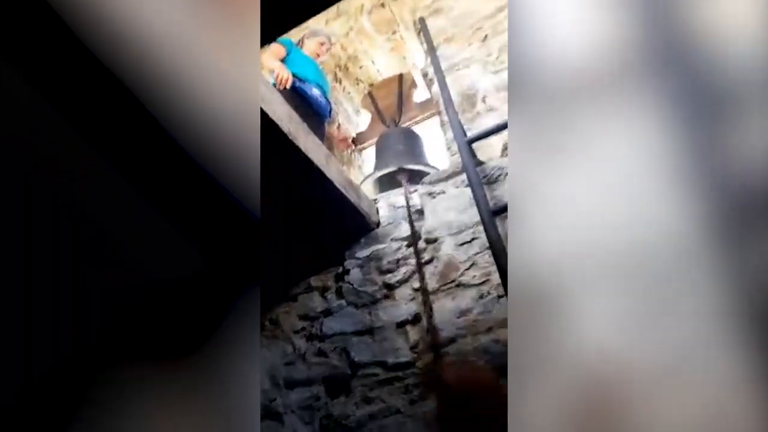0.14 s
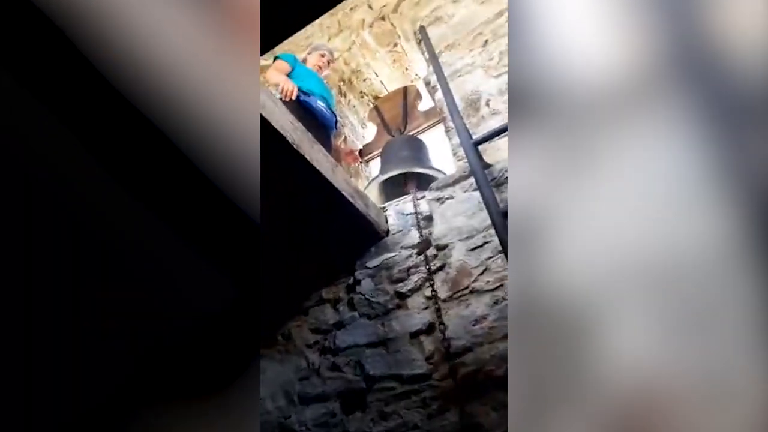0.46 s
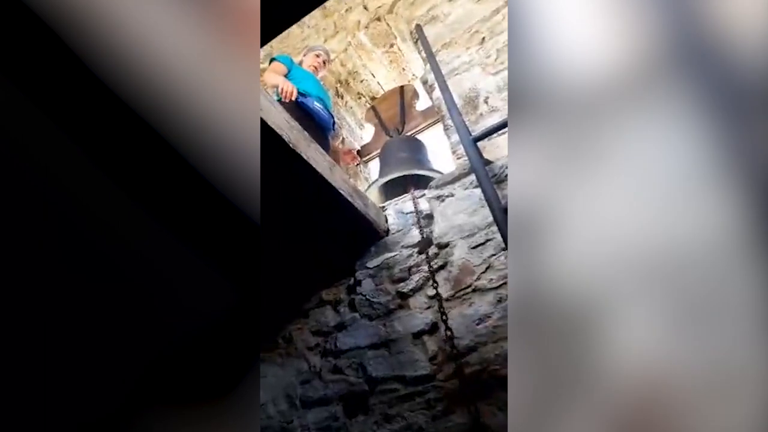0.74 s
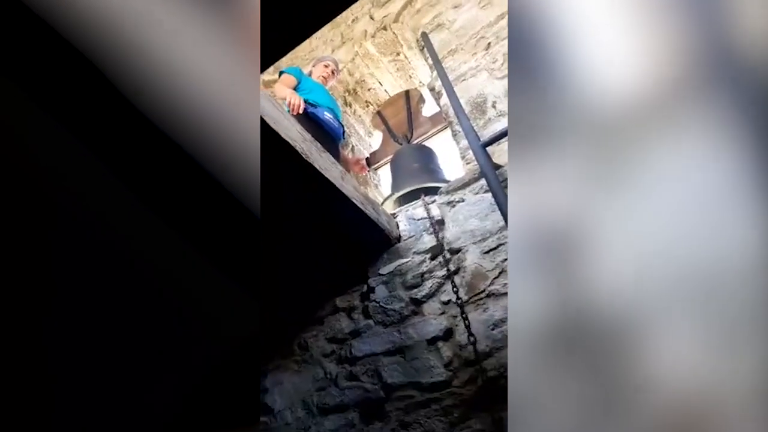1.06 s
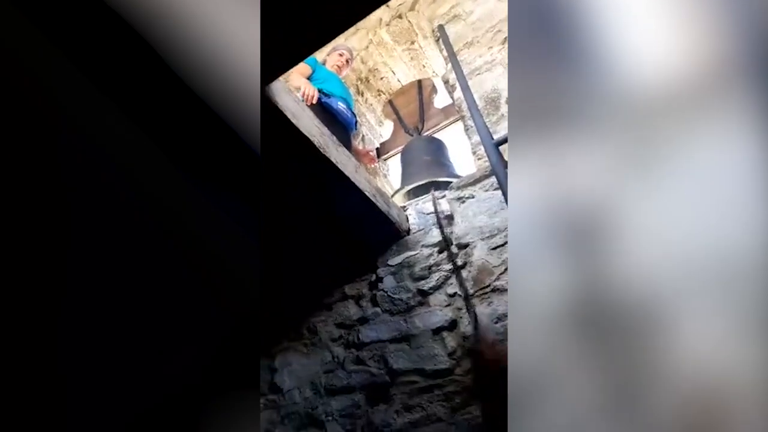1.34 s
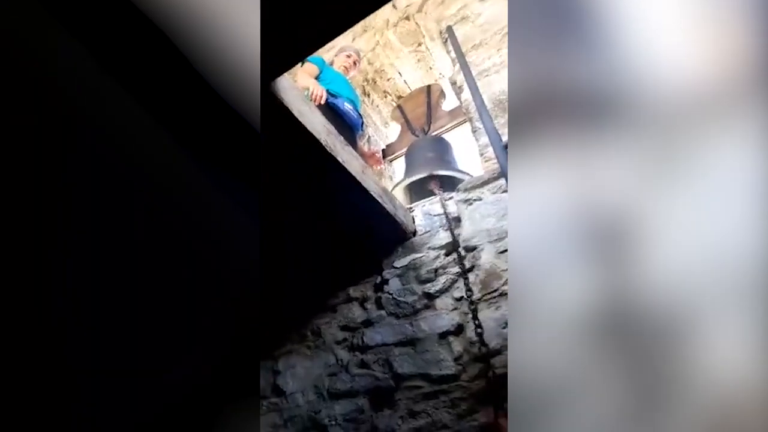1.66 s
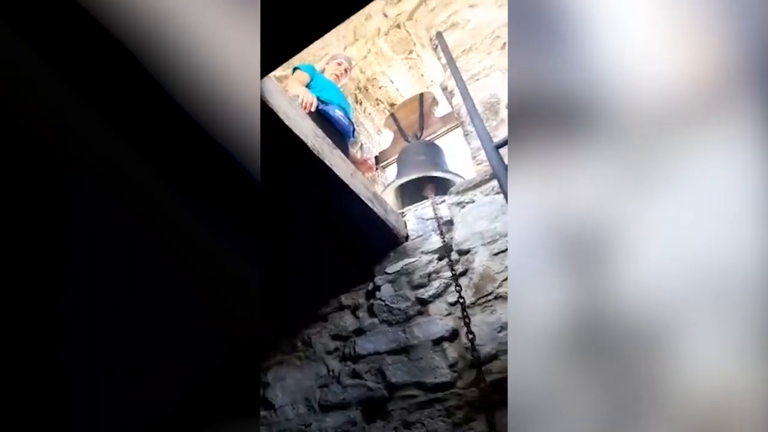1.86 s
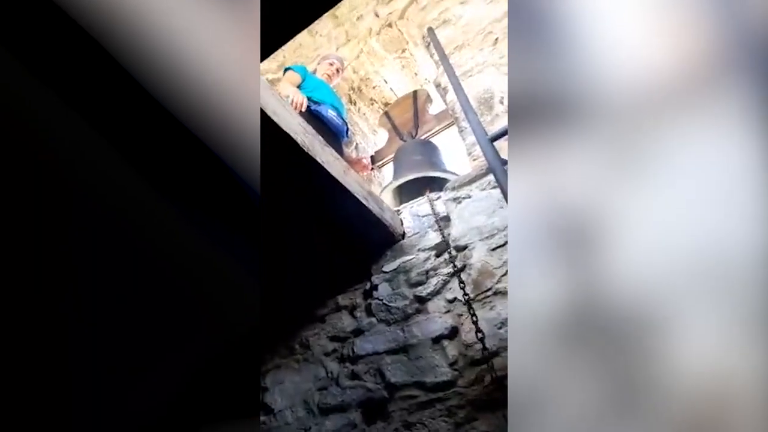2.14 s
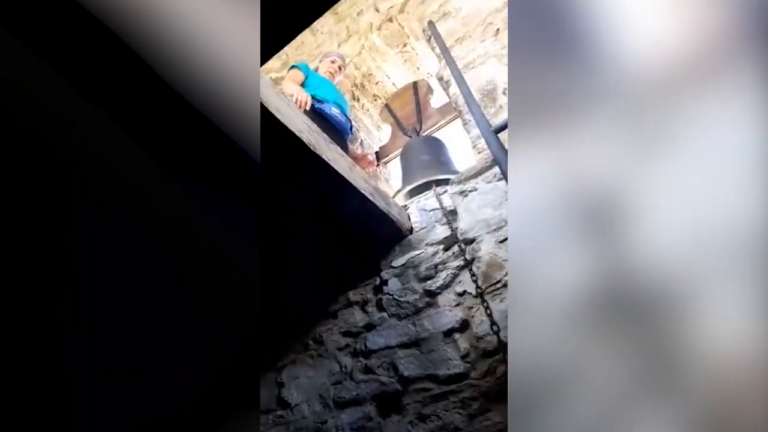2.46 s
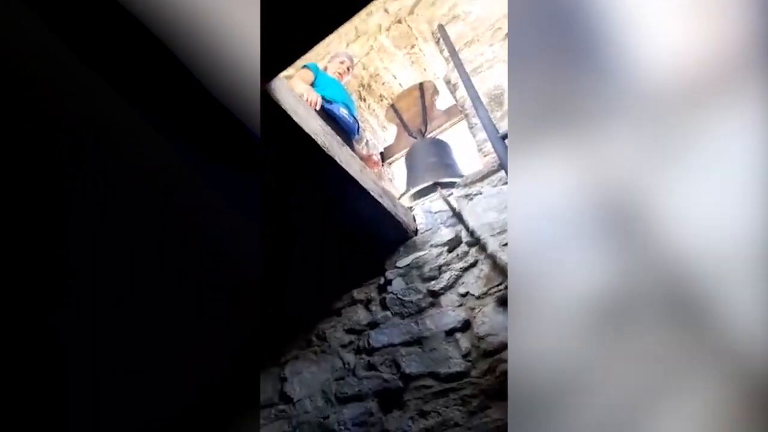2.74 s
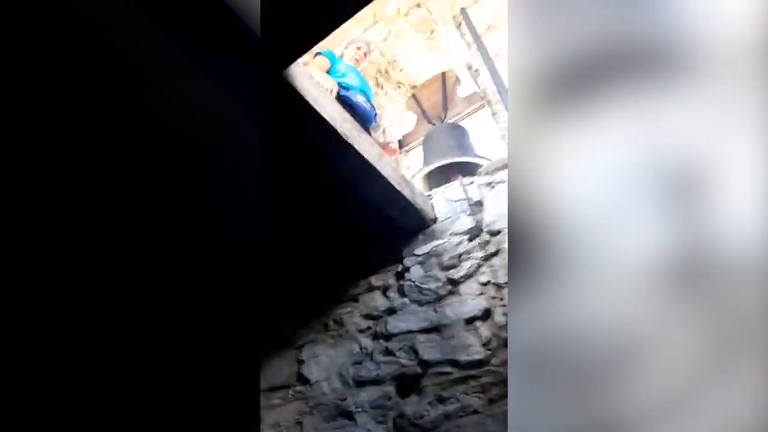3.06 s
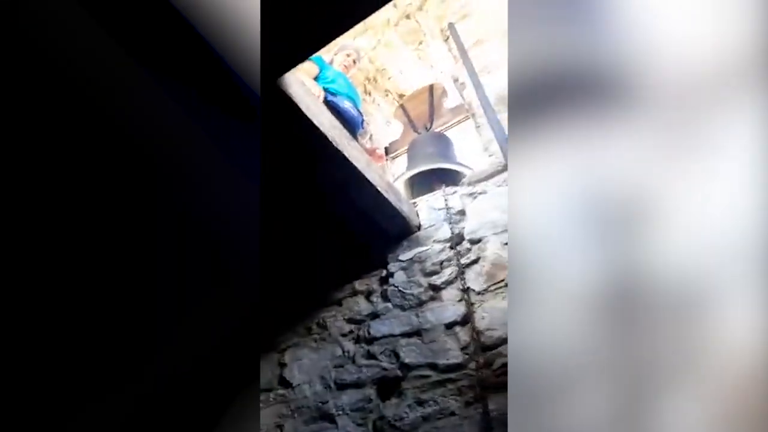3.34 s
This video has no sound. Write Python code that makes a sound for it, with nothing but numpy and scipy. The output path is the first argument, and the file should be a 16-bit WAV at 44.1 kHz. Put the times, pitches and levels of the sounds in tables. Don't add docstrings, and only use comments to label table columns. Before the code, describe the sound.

A large church bell, already humming faintly, is struck by its clapper at about 0.1, 1.5 and 2.7 seconds. Each blow clangs sharply off the stone walls, then rings on with wavering, beating tones and a thin high shimmer, the phone's level creeping up between strokes. Faint rope rustles come between, denser after 3.0, with dry ticks around 3.4 to 3.5. Quiet low tower air lies beneath, in mono.

```python
import sys
import numpy as np
from scipy import signal
from scipy.fft import irfft
from scipy.io import wavfile
from scipy.ndimage import uniform_filter1d, map_coordinates

SR = 44100
rng = np.random.default_rng(int(sys.argv[2]) if len(sys.argv) > 2 else 0)


def amplitude_ratio(level_db):
    exponent = np.asarray(level_db, float) / 20
    return 10 ** exponent


def int16_out(signal):
    q = np.round(np.clip(np.atleast_2d(signal).T, -1, 1) * 32767)
    wavfile.write(sys.argv[1], SR, q.astype(np.int16))


N = 154350
STEP = 32


def along(points, hz):
    f, value = np.transpose(points)
    return np.interp(np.log(hz + 1), np.log(f + 1), value)


def noise(spectrum, decay=None, size=None):
    size = size or N
    hz, t, z = signal.stft(rng.standard_normal(size), SR, nperseg=512)
    gain = amplitude_ratio(along(spectrum, hz))[:, None]
    gain = gain / np.sqrt(np.mean(gain ** 2))
    if decay:
        gain = gain * amplitude_ratio(-60 * t / along(decay, hz)[:, None])
    return signal.istft(z * gain, SR, nperseg=512)[1][:size]


def wander(points, position):
    return map_coordinates(rng.standard_normal(points), [position])


def flutter(size, db):
    z = rng.standard_normal((2, size))
    z = uniform_filter1d(z, size=14, axis=1)
    z = uniform_filter1d(z, size=9, axis=1) * 3
    return 1 + amplitude_ratio(db) * (z[0] + 1j * z[1])


def tone(swing, hz, size):
    i, k = np.arange(size), np.arange(len(swing)) * STEP
    phase = 2 * np.pi * (hz * i / SR + rng.random())
    return np.interp(i, k, swing.real) * np.sin(phase) + np.interp(i, k, swing.imag) * np.cos(phase)


# (f/Hz, level/dB)
AIR = [(25, -28), (80, -11), (200, -12), (450, -31.5), (1000, -35), (4000, -27.5), (14000, -60)]


def tower_air():
    gusts = amplitude_ratio(3.6 * wander(40, np.arange(N) / SR * 10))
    return amplitude_ratio(-70) * gusts * noise(AIR)


STROKES = [
    .131,
    1.457,
    2.733,
]
# (f/Hz, t60/s, twin's offset f/Hz, twin's t60/s)
PARTIALS = [(270.6, 11.8, 1.27, 33.09), (568.8, 13.11, -2.39, 13.88), (688.2, 7.36, 0.79, 5.9),
            (744.1, 4.88, 1.13, 54.6), (1153.6, 3.14, 1.73, 1.08), (1251.6, 2.77, 0.66, 1.78),
            (1301.5, 2.66, 1.31, 1.11), (1414.4, 2.52, -4.45, 2.12), (1625.1, 3.23, 1.74, 1.35),
            (1748.7, 2.64, 1.46, 2.44), (2416.6, 2.7, 4.8, 2.2), (2495.7, 0.66, 2.19, 2.16),
            (3145.4, 2.23, 4.22, 1.95), (3935.4, 1.33, 1.83, 2.07), (1825.9, 1.27, 3.55, 0.79),
            (2102.5, 3.0, 1.11, 1.63), (2253.7, 1.67, 2.09, 1.24), (2318.4, 2.06, 4.08, 0.71),
            (2715.4, 2.66, 1.16, 3.9), (2910.1, 1.75, 8.35, 1.39), (3239.4, 2.66, 5.08, 0.89),
            (3661.8, 2.56, 1.81, 2.18), (4053.3, 3.0, 2.88, 1.21), (4407.6, 1.43, 1.32, 1.95),
            (4773.4, 0.79, 3.33, 1.77), (4914.6, 0.54, 2.51, 1.42), (5649.1, 1.37, 3.3, 0.63),
            (6548.6, 1.77, 3.22, 1.08)]
# (build-up t/s, level left from the earlier stroke/dB, level after each of three strokes/dB)
PARTIAL_DB = [(0.012, -31.5, -40, -45, -34), (0.049, -30, -34, -32, -25.0), (0.004, -38.2, -21, -37, -24),
              (0.013, -40, -31.5, -37.5, -25.5), (0.12, -43.5, -19.5, -15.5, -14.5),
              (0.069, -52, -19.5, -21.5, -27), (0.21, -58.5, -26.5, -27.5, -33.5),
              (0.033, -61.1, -26.5, -36, -28.5), (0.006, -71, -39, -38, -46),
              (0.091, -37.5, -12.5, -25, -19.5), (0.007, -51, -27.5, -40.5, -29),
              (0.135, -76.7, -16.5, -13, -33.5), (0.0013, -52.5, -22, -35.5, -42),
              (0.026, -57, -23.5, -20, -23), (0.135, -73, -33.5, -32, -24), (0.11, -78, -48.5, -56, -40),
              (0.135, -79.4, -30.5, -26.5, -35), (0.18, -74, -31.5, -34.5, -44.0),
              (0.17, -59, -30, -30.5, -29), (0.014, -85, -35.5, -34, -41), (0.22, -64.5, -32.5, -36, -27),
              (0.15, -71, -57.0, -45.3, -44.5), (0.15, -94, -44.5, -52.5, -37.4),
              (0.135, -82.5, -37.5, -40.6, -46), (0.073, -85.5, -20.5, -31.5, -30),
              (0.114, -78.5, -27.5, -22, -28), (0.06, -84, -33, -33.5, -34.5),
              (0.096, -88, -45, -42.6, -40)]
# (level/dB, level/dB, level/dB)
TWIN_DB = [(-22.7, -21.0, -26.5), (-31.5, -31, -34.5), (-30, -34.5, -37.5), (-44.5, -49.2, -42),
           (-13.5, -9, -17.5), (-22.5, -19, -14.4), (-31.1, -29, -31), (-30, -29, -32.3), (-23.1, -26, -24),
           (-26, -14.6, -11), (-28, -21.5, -24.0), (-50.5, -41.5, -36), (-22.5, -19.5, -18.5),
           (-33.5, -39.5, -20.5), (-20, -20.5, -21), (-36, -47, -45), (-36, -33.5, -22), (-30, -30.5, -31),
           (-44, -44.5, -36), (-26.5, -26.5, -30.5), (-20.5, -24.5, -26.5), (-47, -54, -55.5),
           (-29.5, -26.1, -22), (-43.5, -42.5, -36), (-46, -38, -34.5), (-27.5, -31.5, -33.8),
           (-28.5, -47, -34), (-37, -48.5, -46.5)]
# (t/s, t/s, t/s)
DIPS = [(0.022, 0.509, 0.02), (0.334, 0.307, 0.335), (0.022, 1.181, 1.192), (0.661, 0.706, 0.835),
        (0.412, 0.463, 0.367), (1.012, 1.117, 0.041), (0.146, 0.146, 0.023), (0.173, 0.165, 0.157),
        (0.53, 0.54, 0.487), (0.21, 0.293, 0.344), (0.19, 0.175, 0.175), (0.229, 0.394, 0.217),
        (0.024, 0.042, 0.036), (0.101, 0.072, 0.501), (0.224, 0.256, 0.056), (0.123, 0.16, 0.542),
        (0.089, 0.095, 0.054), (0.075, 0.015, 0.05), (0.223, 0.279, 0.418), (0.09, 0.089, 0.089),
        (0.166, 0.031, 0.087), (0.463, 0.032, 0.196), (0.024, 0.246, 0.275), (0.112, 0.082, 0.584),
        (0.109, 0.128, 0.244), (0.072, 0.033, 0.193), (0.065, 0.291, 0.021), (0.078, 0.039, 0.042)]


def beating_partials():
    direct = 0.21
    t, out = np.arange(N // STEP + 1) * STEP / SR, np.zeros(N)
    for partial, levels, twin_dbs, dips in zip(PARTIALS, PARTIAL_DB, TWIN_DB, DIPS):
        hz, t60, split, twin_t60 = partial
        rise, left_db, *dbs = levels
        swing = np.full(len(t), amplitude_ratio(left_db), complex)
        for s, db, twin_db, dip in zip(STROKES, dbs, twin_dbs, dips):
            u = np.clip(t - s, 0, None)
            twin = amplitude_ratio(twin_db - 60 * u / twin_t60) * np.exp(2j * np.pi * split * (u - dip))
            new = amplitude_ratio(db - 60 * u / t60) - twin
            new = new * np.exp(1j * np.angle(swing[round(s * SR) // STEP] / new[0]))
            old_share = direct * np.exp(-u / 0.0033) + (1 - direct) * np.exp(-u / max(rise, .002))
            swing = swing * old_share + new * (1 - old_share)
        out += tone(swing * flutter(len(t), -26.5), hz, N)
    return out


# (start t/s, length t/s, level/dB)
RUSTLES = [(.07, .05, -75), (0.492, 0.052, -66.5), (0.901, 0.11, -55), (1.41, .045, -68.5),
           (1.876, 0.11, -59), (2.094, 0.13, -69.5), (2.263, 0.13, -58.5), (2.699, .035, -72),
           (3.05, .1, -58.5), (3.221, 0.12, -56.5), (3.369, .2, -59)]
# (f/Hz, level/dB)
RUSTLE = [(1500, -34), (3500, -2.5), (6500, 1), (9000, -10), (12000, -4.5), (14500, -18)]
# (t/s, peak level/dB)
TICKS = [(3.377, -46), (3.3803, -37), (3.3857, -45.5), (3.4283, -43.5), (3.4303, -47), (3.463, -39),
         (3.4812, -37.5), (3.484, -39.5), (3.484, -36), (3.489, -41), (3.4908, -43), (3.4939, -36.5),
         (3.4976, -47)]


def rope():
    t, clicks, shape = np.arange(N) / SR, np.zeros(N), np.zeros(N)
    for s, length, db in RUSTLES:
        rise_db = 550 * (s + .01 - t)
        fall_db = 286 * (t - s - length) + 4.18
        shape += amplitude_ratio(db - np.clip(np.maximum(rise_db, fall_db), 0, None))
    shape *= amplitude_ratio(1.75 * wander(N // 150 + 4, np.arange(N) / 150))
    for s, db in TICKS:
        u = np.clip(t - s, 0, None)
        shape += (t >= s) * amplitude_ratio(db - 21) * (2 * amplitude_ratio(-60 * u / 0.007) + amplitude_ratio(-60 * u / .07))
        clicks[round(s * SR)] = amplitude_ratio(db + 10)
    tick = irfft(amplitude_ratio(along(RUSTLE, np.fft.rfftfreq(64, 1 / SR))))
    tick = np.roll(tick, 32) * np.hanning(64)
    return shape * noise(RUSTLE) + np.convolve(clicks, tick / tick.max(), "same")


# (f/Hz, t60/s)
CLANG = [(40, -39.5), (245, -14), (900, -12.5), (1300, -3.5), (4000, -9.5), (8000, -44.5), (14000, -62.5)]
CLANG_T60 = [(60, 0.6), (300, 0.5), (2000, 0.34), (12000, 0.55)]
# (f/Hz, t60/s)
SHIMMER = [(2000, -38), (3500, -8), (6000, -5.5), (7500, -30), (14500, -41.5)]
SHIMMER_T60 = [(3000, 2), (12000, 1.6)]


def clang():
    size = 2 * SR
    out = np.zeros(N + size)
    rise = 1 - np.exp(-np.arange(size) / SR / 0.0013)
    for s in STROKES:
        blow = amplitude_ratio(-21) * noise(CLANG, CLANG_T60, size=size)
        shimmer = amplitude_ratio(-52.5) * noise(SHIMMER, SHIMMER_T60, size=size)
        out[round(s * SR):][:size] += rise * (blow + shimmer)
    return out[:N]


# (f/Hz, level/dB, t60/s)
MINOR = [(1000, -40, .3), (1998, -33, .4), (2725, -47, 2.5), (2424.5, -46, 6), (2962, -38, .6),
         (3934, -51, 6), (5631, -50, 1.7), (6365, -56, 1.2), (6561, -53, 2), (7880, -62, 1.1),
         (10700, -76, 2), (11600, -80, 1.8), (13300, -82, 2)]
# (f/Hz, level/dB, t60/s)
CROWD = [(2201.0, -38, 0.65), (2223.0, -45.7, 1.87), (2643.0, -45.0, 1.01), (2810.0, -46.1, 2.2),
         (2995.0, -39.6, 1.34), (3200.0, -48.9, 2.05), (3486.0, -49.2, 2.2), (3573.0, -46.8, 1.05),
         (3770.0, -43.2, 2.2), (4189.0, -45.2, 1.28), (4314.0, -42.4, 0.92), (4476.0, -46.2, 2.2),
         (4513.0, -43.5, 1.93), (4584.0, -46.7, 1.08), (4618.0, -52.1, 2.2), (4716.0, -55.1, 2.2),
         (4973.0, -54.6, 2.2), (5005.0, -48.2, 1.04), (5073.0, -42.8, 1.36), (5105.0, -40.5, 0.98),
         (5223.0, -53.5, 1.24), (5389.0, -44.3, 0.98), (5465.0, -45.2, 1.63), (5682.0, -52.1, 2.2),
         (5723.0, -53.7, 1.44), (5796.0, -42.9, 1.06), (5833.0, -40.6, 1.06), (5917.0, -50.8, 1.55),
         (5947.0, -45.3, 0.74), (5978.0, -48.9, 1.13), (6103.0, -55.1, 2.2), (6466.0, -52.5, 1.02),
         (6664.0, -53.7, 1.9), (6764.0, -54.9, 0.96), (6799.0, -56.0, 1.47), (6826.0, -58.6, 1.29),
         (6894.0, -55.3, 1.15), (6924.0, -61.5, 1.37), (7178.0, -75.8, 2.2), (7297.0, -55.5, 0.85),
         (7434.0, -53.0, 1.33), (7549.0, -60.5, 1.25), (7580.0, -64.4, 1.47), (7661.0, -58.5, 1.15),
         (7704.0, -71.2, 1.88), (8010.0, -81.2, 2.2), (8312.0, -65.4, 2.2)]
# (f/Hz, t60/s)
SWARM = [(7000, -74.5), (8000, -72), (10000, -79.5), (14000, -82)]
SWARM_T60 = [(3000, 1.52), (6000, 1), (9000, .9)]


def thin_modes():
    out = np.zeros(N + 3 * SR)
    draw = rng.random((60, 3))
    swarm_hz = 7700 * 1.8 ** draw[:, 0]
    swarm_db = along(SWARM, swarm_hz) - 18 * draw[:, 1] + 10
    swarm_t60 = along(SWARM_T60, swarm_hz) * amplitude_ratio(4.5 * draw[:, 2] - 0.5)
    upper = np.array(CROWD) + np.array([0, -1.5, 0])
    modes = [*MINOR, *upper, *zip(swarm_hz, swarm_db, swarm_t60)]
    for s in STROKES:
        for hz, db, t60 in modes:
            size = int(min(1.4, .9 * t60) * SR)
            u = np.arange(size // STEP + 1) * STEP / SR
            beat = 1 + 0.5 * np.exp(2j * np.pi * (rng.uniform(2.7, 24) * u + rng.random()))
            decay = amplitude_ratio(db + rng.normal(0, 3) - 60 * u / t60)
            swing = decay * beat * (1 - np.exp(-u / 0.011)) * flutter(len(u), -19)
            out[round(s * SR):][:size] += tone(swing, hz, size)
    return out[:N]


def gain_creep():
    hold_s, recover_db_per_s = 0.59, 4.5
    t = np.arange(N) / SR
    since = t - np.array([0, *STROKES])[np.searchsorted(STROKES, t)]
    return amplitude_ratio(uniform_filter1d(recover_db_per_s * np.clip(since - hold_s, 0, None), size=600))


def scene():
    bell = beating_partials() + thin_modes() + clang()
    return (bell * gain_creep() + rope() + tower_air())[None]


def top_cut(x):
    return signal.sosfilt(signal.butter(12, 14760, fs=SR, output="sos"), x)


def record(dry):
    return top_cut(dry)


dry = scene()
out = record(dry)
int16_out(out)
```